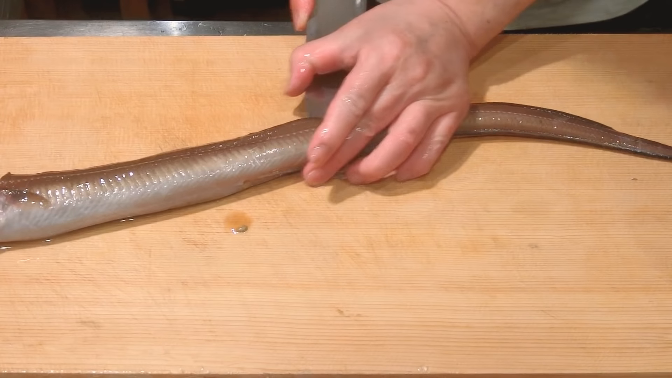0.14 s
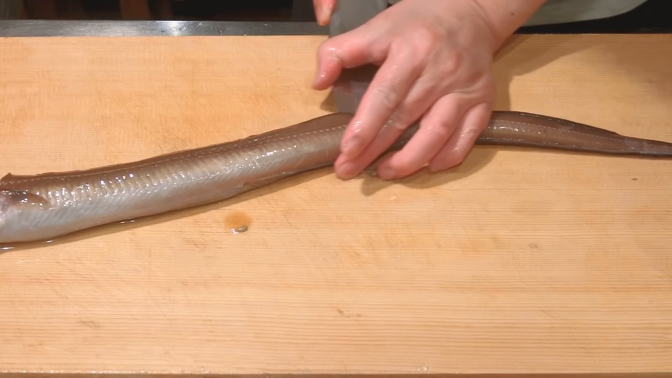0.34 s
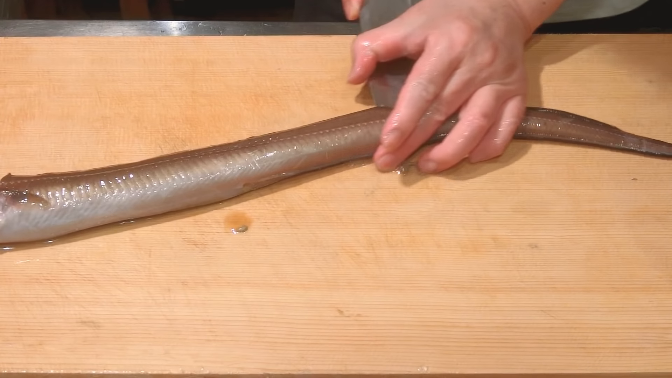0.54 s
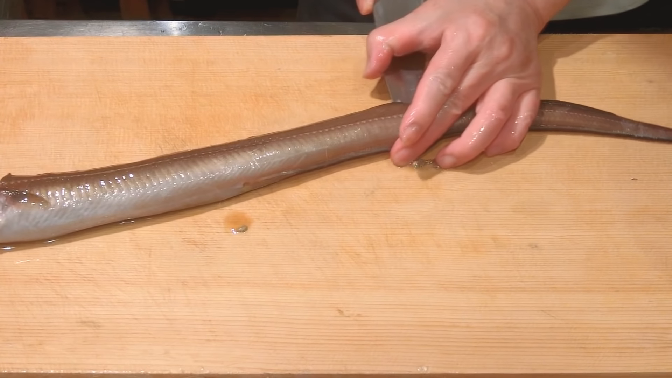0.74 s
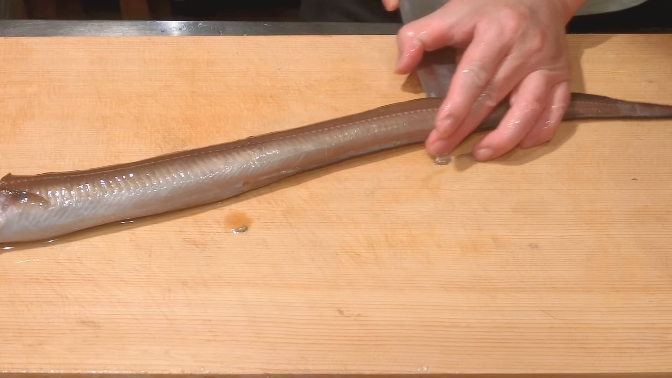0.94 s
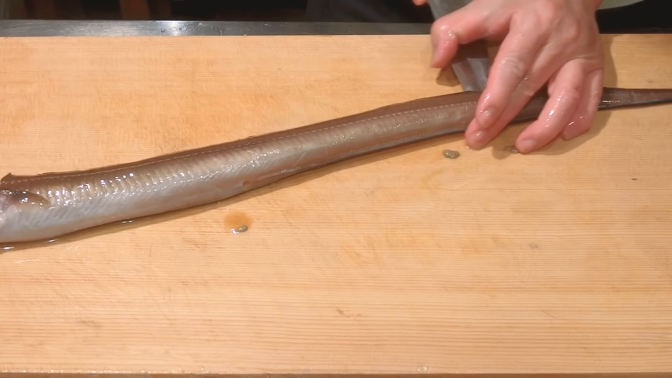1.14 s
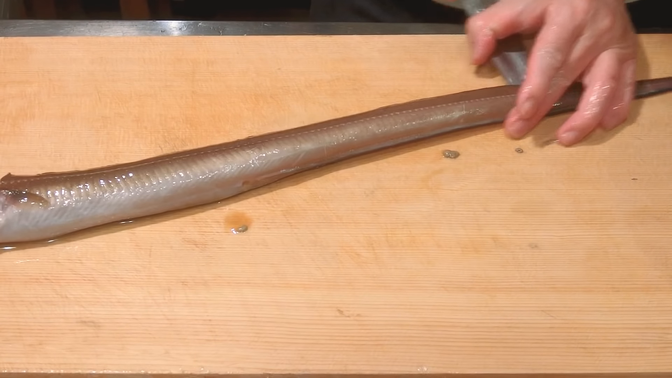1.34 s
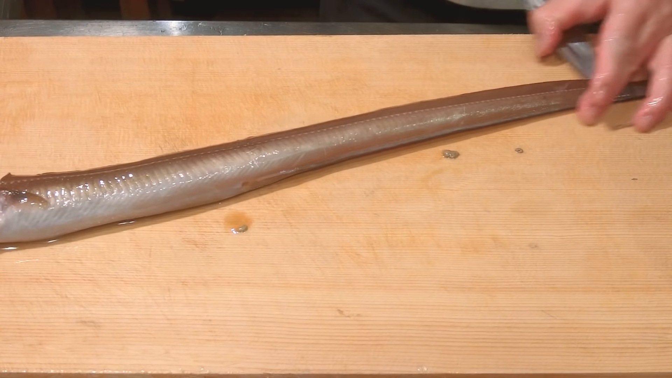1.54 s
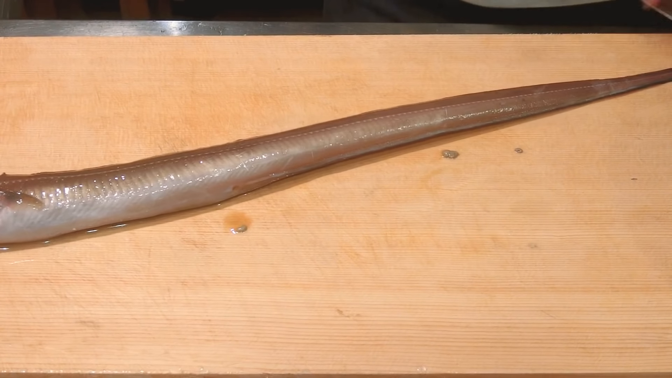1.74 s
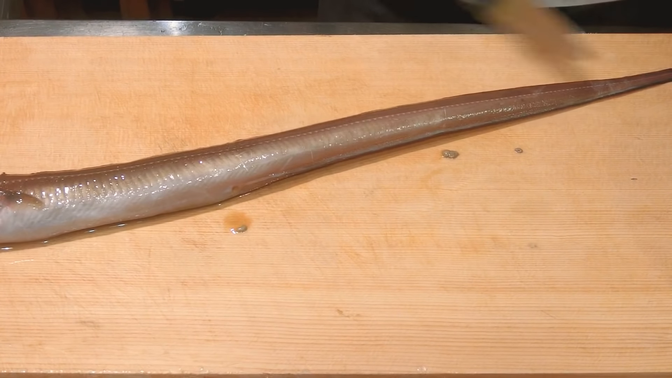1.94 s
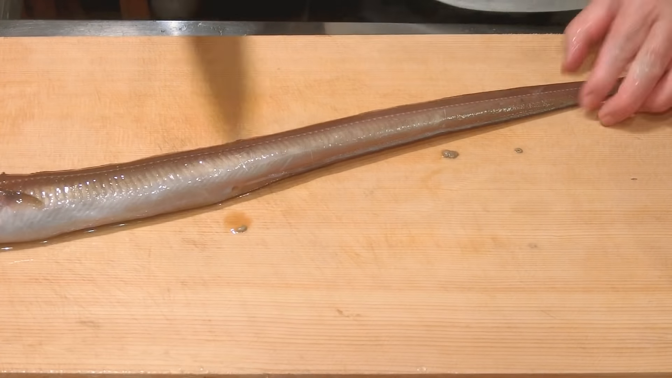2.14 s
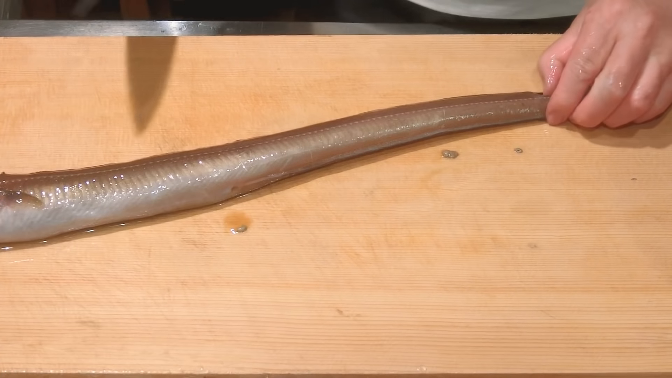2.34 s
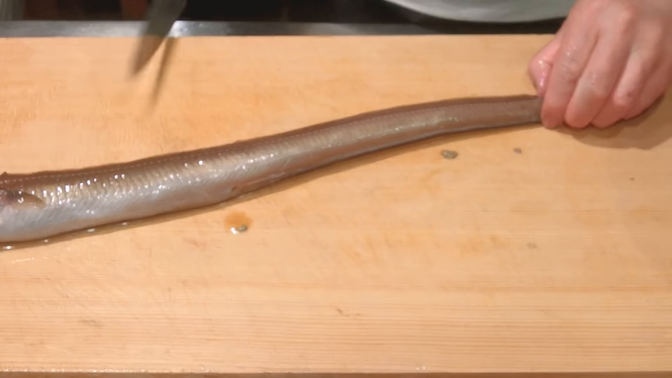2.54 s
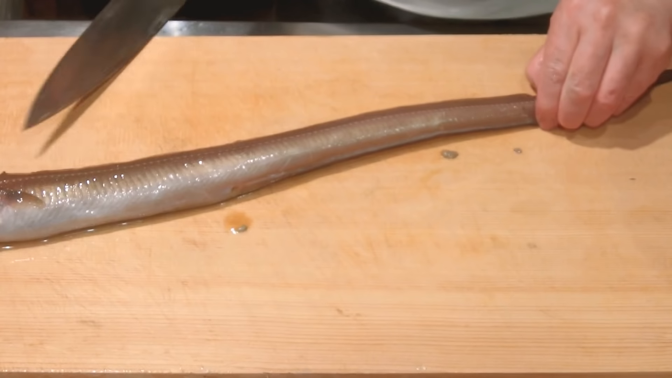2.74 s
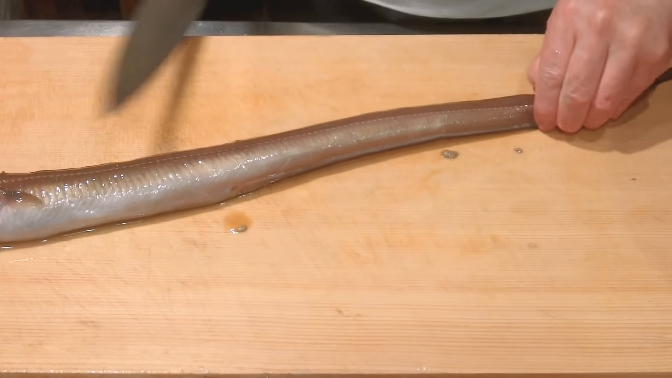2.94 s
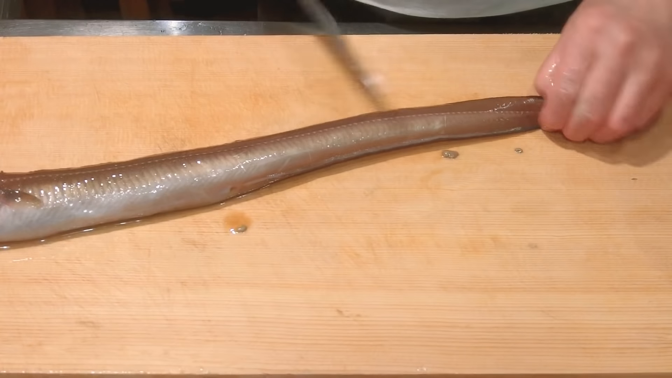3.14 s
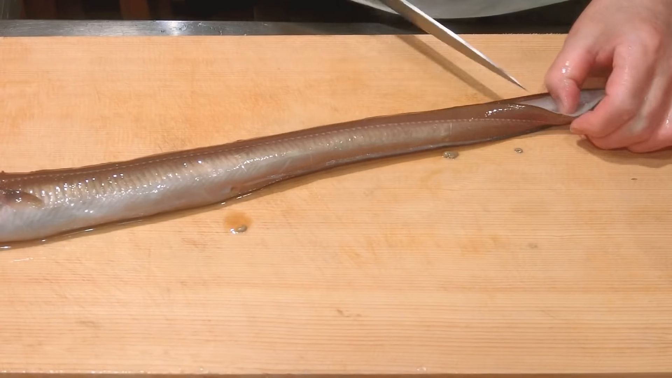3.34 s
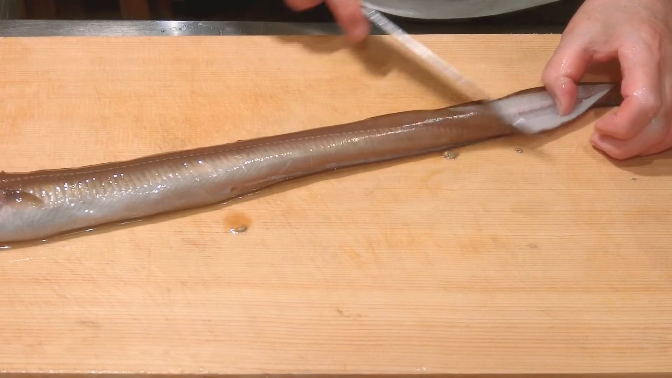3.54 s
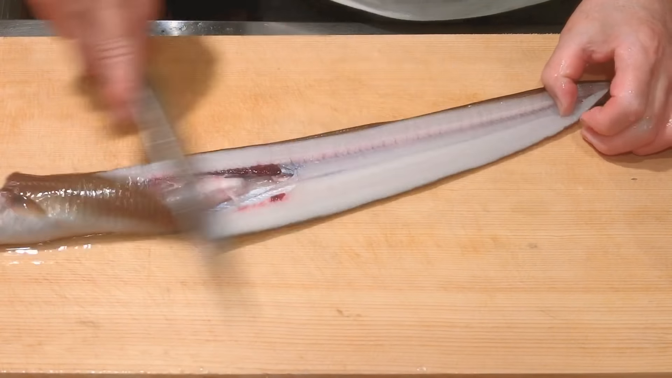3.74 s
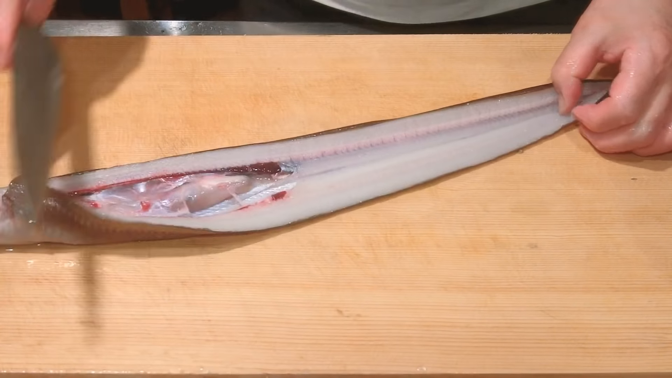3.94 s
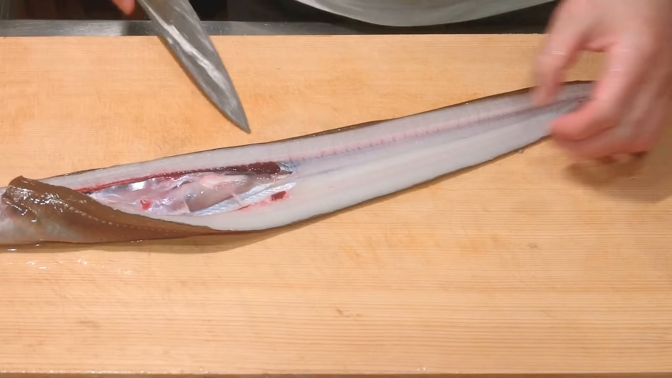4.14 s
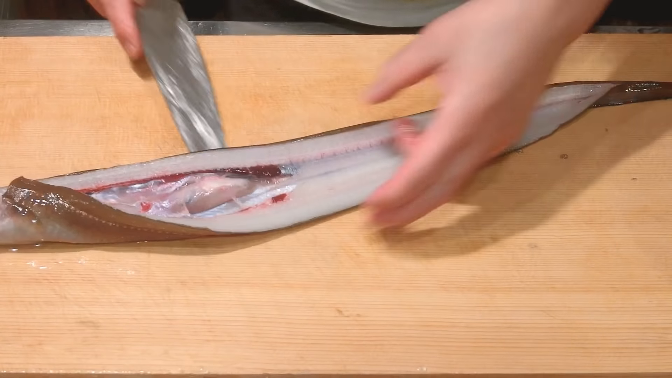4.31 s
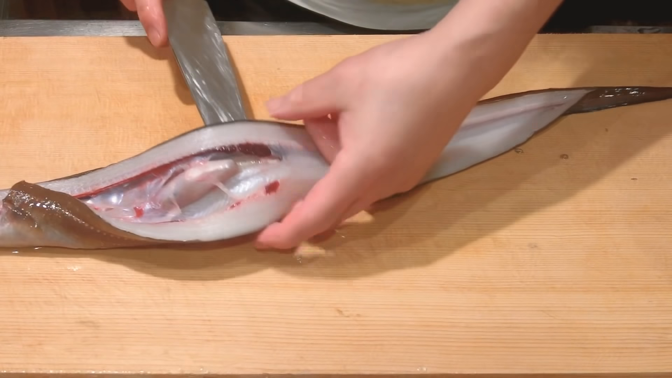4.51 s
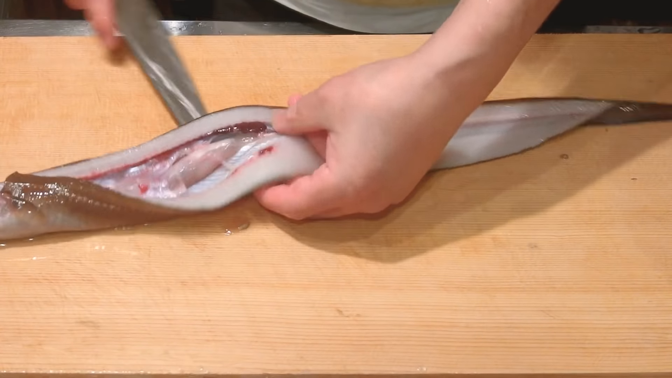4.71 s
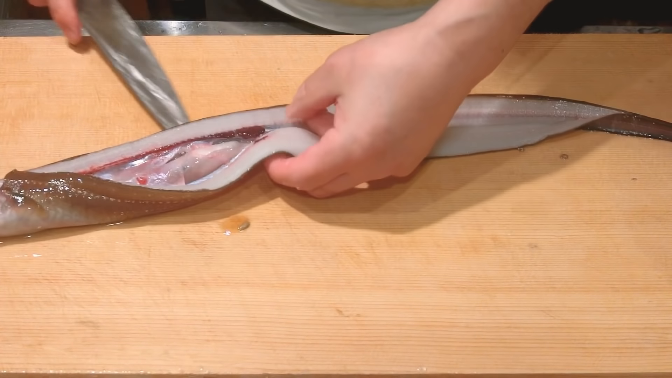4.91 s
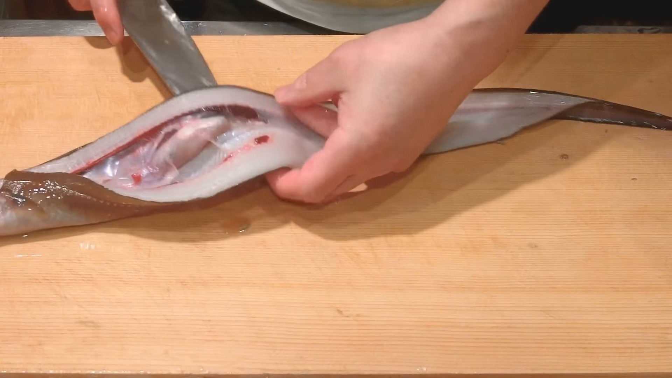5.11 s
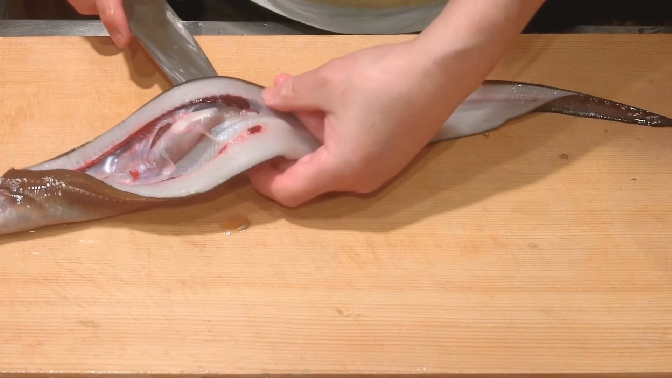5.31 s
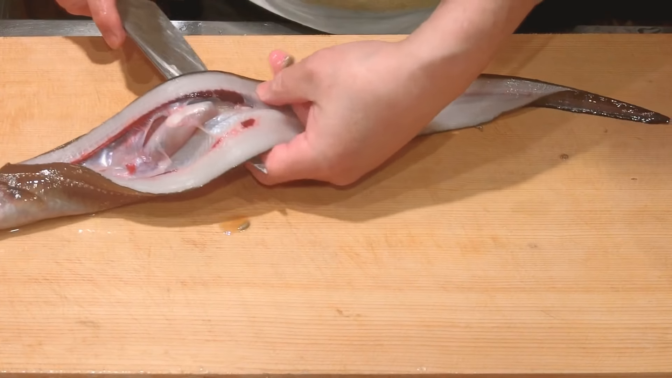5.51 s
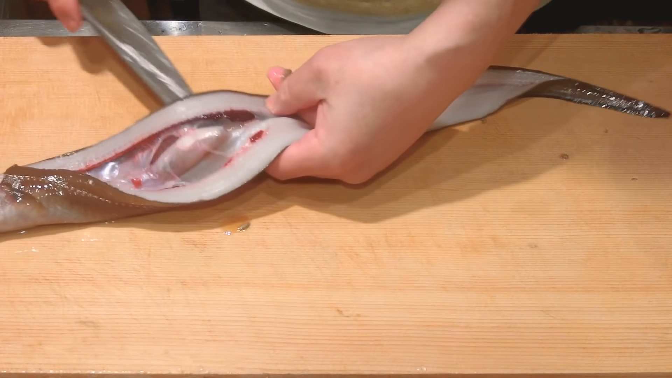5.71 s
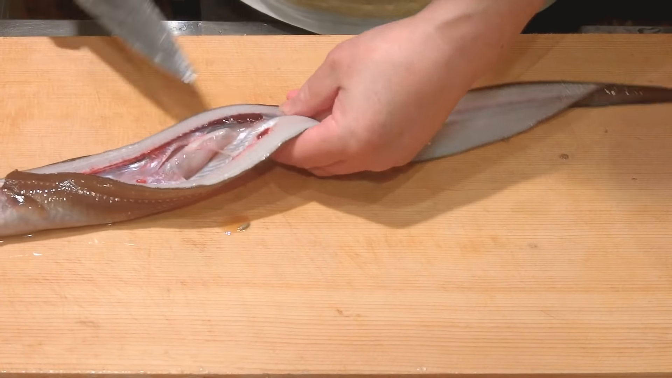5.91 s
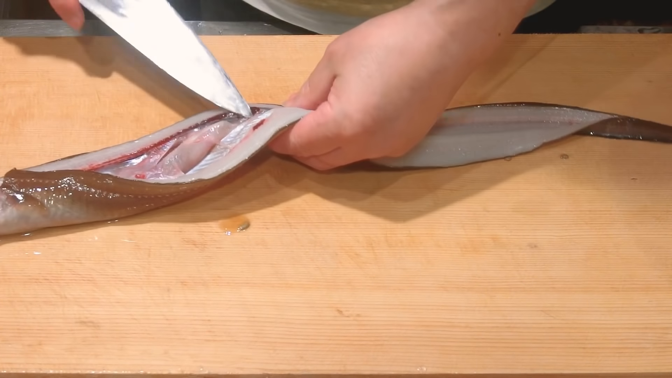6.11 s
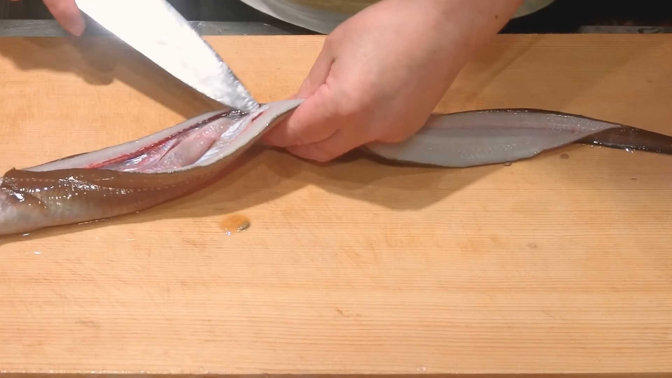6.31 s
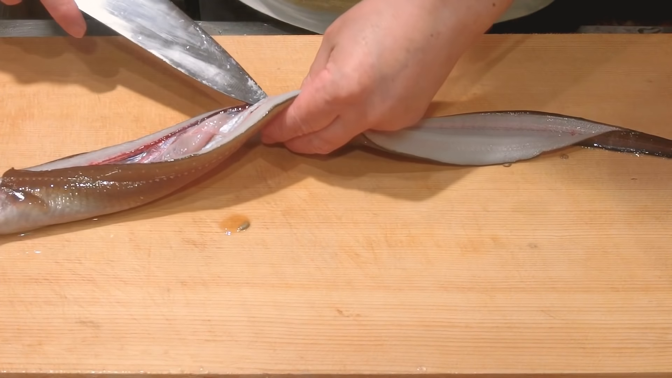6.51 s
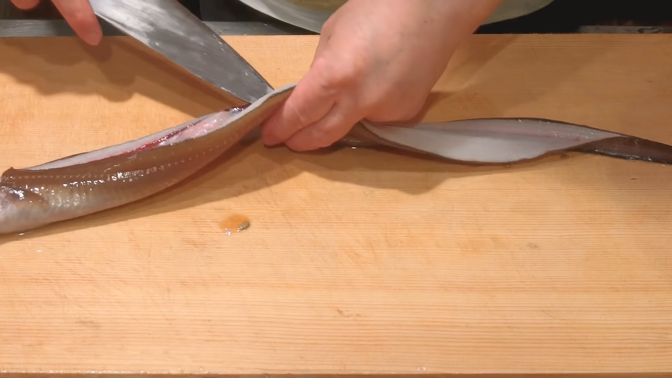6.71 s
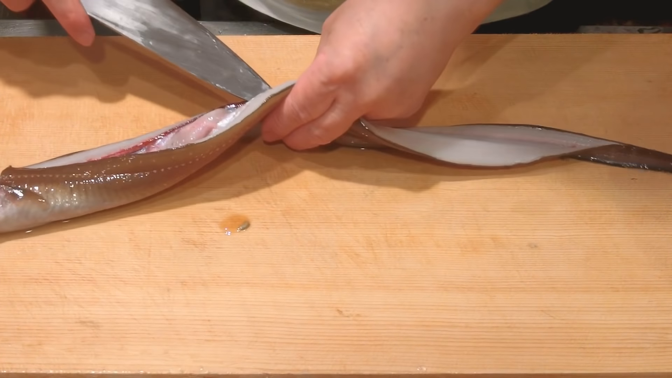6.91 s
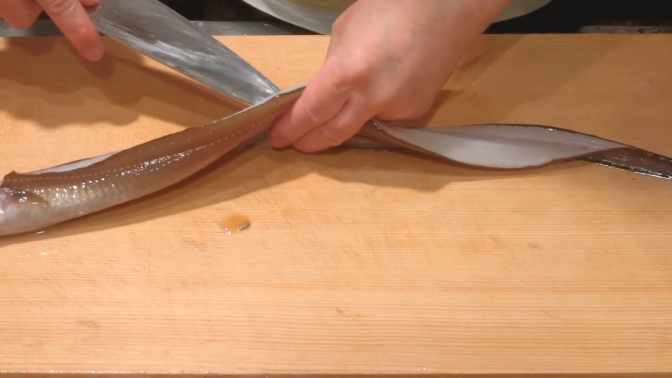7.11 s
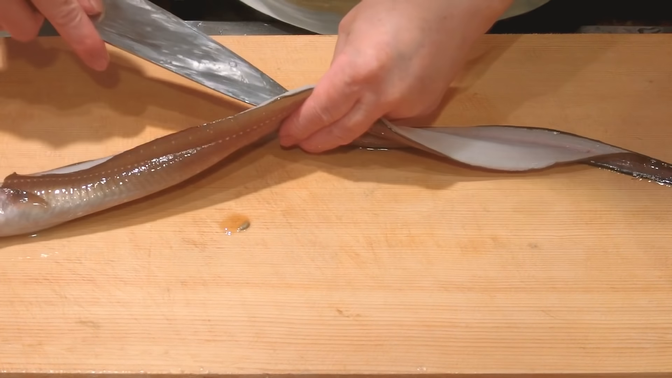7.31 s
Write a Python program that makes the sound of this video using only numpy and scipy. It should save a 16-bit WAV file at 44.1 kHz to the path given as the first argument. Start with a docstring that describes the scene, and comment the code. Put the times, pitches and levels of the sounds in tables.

```python
"""Small kitchen, close stereo view of a wooden board: a knife crunches through an eel's fine bones in two strokes.
Hands lean, a faint knock, light ticks and hollow bumps follow; then the blade wipes the fillet open in one
short hiss, drops and bounces with a metallic ring, and knocks the board hard. Later a faint low drone glides up,
bumps and ticks return, and two squeaks close. Snaps, grains and noise drive resonances of steel and wood;
blows add dying sines, near walls add a short tail, and shaped noise gives the steady air throughout."""
import sys
import numpy as np
from scipy import signal
from scipy.fft import rfft, irfft
from scipy.io import wavfile

SR = 44100
rng = np.random.default_rng(int(sys.argv[2]) if len(sys.argv) > 2 else 0)


def transcribe(signal):
    """Save signal, clipped to [-1, 1], as a 16-bit WAV file at the path in sys.argv[1]."""
    frames = np.atleast_2d(signal).T
    limited = np.clip(frames, -1, 1)
    pcm = np.round(limited * 32767).astype(np.int16)
    wavfile.write(sys.argv[1], SR, pcm)


N = 328986
TIME = np.arange(N) / SR
RING_TIME = TIME[:SR // 2]

# thicker bones snapping under the edge: (time [s], relative level [dB], fizz against blade ring [dB])
THICK_BONES = [(0.077, -39, 2), (0.108, -37.5, 1), (.13, -32.5, 4), (.155, -31, -1), (0.2759, -28.5, -1),
               (0.3131, -32, -11), (0.3384, -30.5, 0.5), (.5613, -28, -1.5), (0.7539, -28, -5),
               (0.812, -34.5, 3), (0.832, -28, -5), (0.8606, -28.5, -4), (0.883, -27, -1.5),
               (0.9463, -28, -3), (0.992, -27.5, -0.5), (1.0515, -27, -2), (1.129, -28.5, -0.5),
               (1.1847, -39, 2), (1.2133, -31, -14), (1.254, -31, -1), (1.4137, -23.5, -7),
               (1.4395, -24.5, -0.5), (1.4664, -29, -3), (1.494, -23, 1.5), (1.5371, -24, 1.5),
               (1.5588, -23, -4), (1.5896, -23.5, 1), (1.6078, -24, -18)]
# strokes of the long cut: (start [s], end [s], relative level [dB])
CUT_STROKES = [(0.097, 0.635, 0.5), (0.758, 1.619, -1.5)]
# how hard the hand bears down, most at the tail: (time [s], pressure [dB])
HAND_PRESSURE = [(.1, -3.5), (.56, -2.5), (.78, -2), (.9, 1.5), (1.06, 2), (1.115, -2), (1.2, 1.5),
                 (1.32, 5), (1.6, 11), (1.7, 11.5)]
# spectrum of the wet fizz: (frequency [Hz], relative level [dB])
FIZZ_SPECTRUM = [(1500, -13.5), (3500, -2.5), (6000, -5), (8500, -5.5), (10500, -1), (12500, 4), (14500, 3),
                 (16000, -8)]
# spectrum of the board under the cut: (frequency [Hz], relative level [dB])
BOARD_SPECTRUM = [(40, -17.5), (90, -25), (145, 5), (230, -12.5), (400, -4.5), (560, -1), (800, 11.5),
                  (1000, 7), (1350, 8), (2000, 5.5), (3000, -0.5), (6000, -56)]
# the blade's main ring, damped by flesh: (frequency [Hz], width [Hz], relative level [dB])
BLADE_MAIN_RING = [(2840, 117, -6), (2954, 64, 3)]
# the blade's upper ring: (frequency [Hz], width [Hz], relative level [dB])
BLADE_UPPER_RING = [(4340, 250, 1.5), (4240, 220, 6), (6340, 570, -5)]
# spectrum of the board under the sweep: (frequency [Hz], relative level [dB])
SWEEP_BOARD_SPECTRUM = [(88, -40), (150, -14), (433, -32), (509, 7.5), (598, -53), (749, 10), (969, -12),
                        (1160, -4), (1760, 4.5), (1930, -11), (2800, 13), (3800, -0.5), (7000, -12),
                        (9100, -53), (15400, -120)]
# modes of the free blade: (frequency [Hz], width [Hz], relative level [dB])
FREE_BLADE = [(2160, 31, -0.5), (2270, 60, 5), (2630, 35, 2.5), (2820, 42, -15), (3260, 32, -18),
              (3404, 27, 5), (4770, 130, -11), (5800, 59, -3), (7030, 84, -7), (9400, 60, 1),
              (10850, 130, 0.5), (12330, 58, -14), (13200, 120, -13), (13700, 58, -10), (14500, 62, -11)]
# the knife drops on the board and bounces: (time [s], relative level [dB])
KNIFE_BOUNCES = [(4.1598, 2), (4.1622, -8.5), (4.1968, -1.5), (4.2212, -7.5)]
# broad resonances under the bouncing knife: (frequency [Hz], width [Hz], relative level [dB])
BOUNCE_RESONANCES = [(517, 59, -11), (1070, 74, 14.5), (1486, 120, 13.5), (2000, 270, 8), (2530, 160, 8.5),
                     (2760, 210, -13), (3440, 190, -1), (4250, 200, -4), (4470, 170, -16), (6000, 120, -19),
                     (12000, 5000, -15)]
# the knife's ring, before tilt: (frequency [Hz], relative level [dB])
KNIFE_RING = [(521, -2), (619, -9), (974, -5), (1004, -4), (1056, -2), (1091, -2), (1462, -3), (1546, 0),
              (1581, -3), (2026, -5), (2063, -5), (2196, -6), (2225, -6), (2496, -2), (2542, -4),
              (2577, -3), (2960, -8), (3353, -10), (3551, -13), (4439, -12), (5039, -15), (6012, -13),
              (6068, -14), (11272, -20), (11329, -20)]
# knocks on the board, the first far fainter: (time [s], relative level [dB])
BOARD_KNOCKS = [(2.1332, -25), (4.7133, 2.5)]
# broad resonances under a knock: (frequency [Hz], width [Hz], relative level [dB])
KNOCK_RESONANCES = [(542, 47, 5.5), (840, 100, 7), (1135, 300, 14.5), (1870, 260, 13.5), (2190, 220, 6.5),
                    (2610, 210, -18), (3120, 55, 8), (3270, 73, 6.5), (4320, 64, 0.5), (5960, 180, -17),
                    (10300, 3500, -12), (11100, 890, -11), (14500, 260, -1)]
# ring of board and blade struck together, before tilt: (frequency [Hz], relative level [dB])
KNOCK_RING = [(138, -16), (345, -13), (518, -8), (620, -11), (817, -9), (933, -9), (1069, -7), (1134, -4),
              (1182, 0), (1240, -3), (1346, -1), (1718, -2), (1831, -5), (2020, -5), (2125, -2), (2157, -4),
              (2295, -6), (2490, -7), (2686, -3), (2879, -8), (2944, -6), (3133, -1), (3465, -8),
              (4297, -9), (4841, -9), (6020, -16), (7100, -18), (9384, -17), (11300, -18), (14590, -11)]
# light taps and wet ticks of knife and fingers:
# (time [s], relative level [dB], centre [Hz], spread [octaves], decay [s])
LIGHT_TICKS = [(2.138, -26.5, 690, 1.03, 0.011), (2.387, -45, 3100, .5, 0.0041),
               (2.4004, -43, 2800, 0.46, .005), (2.4174, -40, 3350, 0.64, 0.0039),
               (2.453, -39.5, 3040, 0.4, 0.0028), (2.7, -43, 5000, 2, 0.009),
               (2.705, -41, 11600, .5, 0.068), (2.728, -35.5, 1480, 1.14, 0.037),
               (2.972, -41.5, 1350, 0.46, 0.0064), (2.99, -32, 1080, 1.1, 0.0055),
               (3.236, -42, 2950, 0.38, 0.0026), (3.266, -43.5, 3500, 2.1, 0.0056),
               (3.6255, -43, 11400, 0.6, .003), (3.731, -28, 2800, 0.14, 0.0038),
               (3.754, -19, 12900, 0.15, 0.0037), (5.017, -41, 4300, 2, 0.05),
               (5.7049, -38, 11100, 0.21, 0.0029), (6.668, -38, 1880, 0.98, 0.0072),
               (6.669, -43.5, 4400, 0.11, 0.014), (6.67, -38, 12500, 0.86, 0.031),
               (6.991, -49, 10900, .9, .005), (7.4277, -45, 6000, 2, .008)]
# dull bumps of things moved on the counter: (time [s], relative level [dB], upper against lower ring [dB])
COUNTER_BUMPS = [(2.683, -4, -5), (2.715, -5, -3), (2.731, -7.5, 7), (2.751, -9, -2), (2.773, -10, 9),
                 (6.874, -4.5, -5), (6.919, -11, 4.5), (6.942, -14, 2), (6.969, -10.5, 1)]
# low and high pair of bump modes, before tilt: (frequency [Hz], relative level [dB])
BUMP_RING = [(340, 3.5), (430, 5.5), (1050, 12), (1170, 0)]
# hands land and lean on the board: (time [s], level [dB], release [dB per s])
HAND_PRESSES = [(1.43, -59.5, 50), (2.14, -56, 200), (2.566, -51.5, 600), (2.73, -59.5, 73),
                (4.72, -58, 135), (4.9, -66, 9.5)]
# two faint squeaks: (time [s], length [s], level [dB], frequency [Hz])
FAINT_SQUEAKS = [(7.272, 0.063, -60.5, 1870), (7.385, 0.08, -57, 1850)]
# spectrum of the air noise: (frequency [Hz], relative level [dB])
AIR_SPECTRUM = [(15, -69), (25, -18), (49, -16), (114, -22), (137, -19), (170, -10.5), (236, -16),
                (394, -9), (560, -13), (607, -5.5), (1160, -18.5), (1890, -18.5), (2910, -22.5),
                (14400, -31.5), (16000, -31.5)]
# resonances in the air noise: (frequency [Hz], width [Hz], relative level [dB])
AIR_RESONANCES = [(177.8, 13, -2), (417, 20, -7.5), (524, 14.5, 1.5), (611, 13, 2.5), (737, 13, -3),
                  (927, 13.3, -1)]
# stereo side of the work on the board: (frequency [Hz], relative level [dB])
WORK_SIDE = [(60, -1), (200, -4), (1000, -22), (2200, -33), (4500, 0), (9000, 4.5), (15000, -0.5)]
# stereo side of the hits: (frequency [Hz], relative level [dB])
HIT_SIDE = [(60, -12), (300, -20), (900, -18.5), (2000, -15), (2800, -7), (4500, -2), (9000, 1),
            (15000, -2)]
# stereo side of the air: (frequency [Hz], side against mid [dB])
AIR_SIDE = [(60, -4), (110, -19), (200, -8), (380, -10), (700, -13.5), (1290, -5), (2380, -4.5), (4400, -1),
            (8120, -0.5), (15000, 3)]

STROKE_RISE_S, EDGE_RELEASE_DB_PER_S, BOARD_RELEASE_DB_PER_S = 0.008, 520, 200
# drive of each layer at pressure 0 dB, and the dB it gains per dB of pressure
RASP_DB, RASP_SLOPE = -52.5, 0.54
FIZZ_DB, FIZZ_SLOPE = -44, 0.75
BOARD_DB, BOARD_SLOPE = -53, 1.11
SNAP_DB = 13.5  # gain of the snaps into blade and fizz
# fine bones come at a loose, steady pace; scatter is a share of the gap, levels are relative
FINE_GAP_S, FINE_SCATTER, FINE_DB, FINE_SPREAD_DB, FINE_FIZZ_DB = 0.017, 0.3, -35, 2, -3.5
STALL_S, STALL_DB = 0.019, -6.5  # the edge slows just before a thick bone gives
# the sweep holds full speed between two times
SWEEP_FROM_S, SWEEP_TO_S, SWEEP_RISE_DB_PER_S, SWEEP_FALL_DB_PER_S = 3.679, 3.785, 300, 398
SWEEP_HISS_DB, SWEEP_BODY_DB = -40.5, -45.5  # relative drive
SLAP_S, SLAP_WIDTH_S, SLAP_DB = 3.732, 0.014, 14  # midway the blade leans on the board
HIT_DIP_HZ, HIT_DIP_WIDTH_HZ, HIT_DIP_SHARE = 3930, 280, 0.59  # a gap between the struck modes
PRESS_RISE_DB_PER_S = 900
DRONE_FROM_S, DRONE_TO_S, DRONE_EDGE_DB_PER_S = 5.27, 5.86, 253
DRONE_START_DB, DRONE_SWELL_DB = -66, 2
DRONE_LOW_HZ, DRONE_HIGH_HZ, DRONE_GLIDE_AT_S, DRONE_GLIDE_S = 143.9, 161, 5.39, 0.05
AIR_DB, AIR_RESONANCE_DB = -59.73, -64.5
EDGE_HZ = 15900


def cut():
    """The edge stalls on bones and snaps through; with tearing fibres it rings blade, fizz and board."""
    pressure = np.interp(TIME, *np.transpose(HAND_PRESSURE))
    edge, board = strokes(EDGE_RELEASE_DB_PER_S), strokes(BOARD_RELEASE_DB_PER_S)
    snaps, spits, stall = np.zeros(N), np.zeros(N), np.zeros(N)
    for at, db, wet_db in THICK_BONES:
        add(snaps, at, amp(db) * burst(decay_s=0.0087))
        add(spits, at, amp(db + wet_db) * burst(decay_s=0.01))
        add(stall, at - STALL_S, np.sqrt(np.linspace(0, 1, int(STALL_S * SR))))
    moving = amp(STALL_DB * stall)
    bite = edge * amp(RASP_SLOPE * pressure)
    fine = fine_bones() * moving * bite
    snaps = snaps + fine
    spits = spits + amp(FINE_FIZZ_DB) * fine

    grip = judder(depth_db=3.0, rate_hz=250) * moving
    fibres = grains(per_s=2700, spread_db=9.0) * grip
    film = grains(per_s=5000, spread_db=0.0) * grip
    drive = amp(RASP_DB) * fibres * bite + amp(SNAP_DB) * snaps

    # bearing down chokes the blade's upper ring and passes more of each snap to the wood
    choke = amp(-0.6 * np.maximum(pressure, 0) - 3.5)
    blade = through(drive, resonances(BLADE_MAIN_RING))
    blade = blade + through(drive * choke, resonances(BLADE_UPPER_RING))
    wet = film * edge * amp(FIZZ_DB + FIZZ_SLOPE * pressure) + amp(SNAP_DB) * spits
    fizz = through(wet, unit_energy(colour(FIZZ_SPECTRUM)))
    push = grains(per_s=3500, spread_db=0.0) * grip * board * amp(BOARD_DB + BOARD_SLOPE * pressure)
    push = push + snaps * amp(6.5 + 0.5 * pressure)
    return blade + fizz + through(push, unit_energy(colour(BOARD_SPECTRUM)))


def strokes(release_db_per_s):
    """Gain of the cutting strokes: each bites at once, holds and dies away."""
    gain = np.zeros(N)
    for start, end, db in CUT_STROKES:
        rise = np.clip((TIME - start) / STROKE_RISE_S, 0, 1)
        gain += rise * amp(db - release_db_per_s * np.maximum(TIME - end, 0))
    return gain


def fine_bones():
    """A loosely regular run of small snaps of uneven size."""
    out = np.zeros(N)
    for k, (shift, size) in enumerate(rng.standard_normal((120, 2))):
        at = (k + FINE_SCATTER * shift) * FINE_GAP_S
        add(out, at, amp(FINE_DB + FINE_SPREAD_DB * size) * burst(decay_s=0.0065))
    return out


def sweep():
    """The blade skims wet flesh: fine grains excite the board, wet fizz and narrow modes of the steel."""
    speed = held(SWEEP_FROM_S, SWEEP_TO_S, SWEEP_RISE_DB_PER_S, SWEEP_FALL_DB_PER_S)
    lean_db = SLAP_DB * np.exp(-((TIME - SLAP_S) / SLAP_WIDTH_S) ** 2)
    grip = judder(depth_db=3.0, rate_hz=150) * speed
    rub = grains(per_s=2300, spread_db=5.5) * grip * amp(SWEEP_BODY_DB + lean_db)
    body = through(rub, unit_energy(colour(SWEEP_BOARD_SPECTRUM)))
    skim = grains(per_s=6200, spread_db=3.0) * grip * amp(SWEEP_HISS_DB)
    hiss = amp(3.5) * through(skim, unit_energy(colour(FIZZ_SPECTRUM)))
    steel = amp(-1.5) * through(skim, resonances(FREE_BLADE))
    return body + hiss + steel


def strike(blows, body, ringing, crack_db, rattle_db, rattle_s, wet_db):
    """A sharp crack and short dense rattle of the wood, thrown back by the walls, over ringing modes."""
    force, rings = np.zeros(N), np.zeros(N)
    for s, db in blows:
        add(force, s, amp([db + crack_db]))  # a single-sample click
        add(force, s, amp(db + rattle_db) * burst(rattle_s))
        add(rings, s, amp(db) * ringing)
    gap = signal.lfilter(*signal.iirpeak(HIT_DIP_HZ, HIT_DIP_HZ / HIT_DIP_WIDTH_HZ, SR), force)
    wood = through(force - HIT_DIP_SHARE * gap, resonances(body))
    return kitchen(wood, wet_db, t60=0.27) + rings


def ticks():
    """Small contacts: a short puff with one broad hump in its spectrum."""
    out, hz = np.zeros(N), np.geomspace(50, 16000, 40)
    for s, db, centre_hz, octaves, decay_s in LIGHT_TICKS:
        hump_db = -12 * np.log1p((np.log2(hz / centre_hz) / octaves) ** 2)
        puff = through(burst(decay_s), unit_energy(colour(np.c_[hz, hump_db])))
        add(out, s, amp(db + 11.0) * puff)
    return out


def bumps():
    """Soft blows on something hollow with a low and a high pair of modes."""
    out = np.zeros(N)
    low = ring(BUMP_RING[:2], t60=0.048, damping=0.26, tilt_db=-3.0)
    high = ring(BUMP_RING[2:], t60=0.048, damping=0.26, tilt_db=-3.0)
    for s, db, upper_db in COUNTER_BUMPS:
        hollow = low + amp(upper_db) * high
        add(out, s, amp(db - 53) * through(hollow, burst(decay_s=0.002)))
    return out


def handling():
    """Hands press and drag on the board: noise in low resonances, and two short narrow-band squeaks."""
    weight = sum(amp(db) * held(s, s, PRESS_RISE_DB_PER_S, release) for s, db, release in HAND_PRESSES)
    low_modes = resonances([(70, 17, -7), (118, 13, 1.0), (169, 23, 0.0)])
    out = through(rng.standard_normal(N) * weight, low_modes)
    for s, length, db, hz in FAINT_SQUEAKS:
        squeak = through(rng.standard_normal(len(RING_TIME)), resonances([(hz, 120, 0)]))
        squeak = unit(squeak[:int(length * SR)])
        add(out, s, amp(db) * squeak * np.hanning(len(squeak)))
    return out


def drone():
    """A low tone of wavering level with a weaker partner a fifth below; it grows as its pitch rises."""
    risen = (1 + np.tanh((TIME - DRONE_GLIDE_AT_S) / DRONE_GLIDE_S)) / 2
    hz = DRONE_LOW_HZ + (DRONE_HIGH_HZ - DRONE_LOW_HZ) * risen
    phase = 2 * np.pi * np.cumsum(hz) / SR
    tone = np.sqrt(2) * (np.sin(phase) + amp(-12) * np.sin(phase / 1.5))
    gain = amp(DRONE_START_DB + DRONE_SWELL_DB * risen)
    gain = gain * held(DRONE_FROM_S, DRONE_TO_S, DRONE_EDGE_DB_PER_S, DRONE_EDGE_DB_PER_S)
    return gain * judder(depth_db=-1.5, rate_hz=12) * tone


def kitchen(x, wet_db, t60):
    """Nearby walls add a short, dense tail of decaying noise with its own spectrum."""
    t = RING_TIME
    onset = np.clip(t / 0.0024 - 0.5, 0, 1)  # begins 1.2 ms after the direct sound
    tail = rng.standard_normal(len(t)) * np.exp(-np.log(1000) * t / t60) * onset
    tail = through(unit_energy(tail), colour([(100, 4.4), (1000, 0.52), (3000, 1.9), (6000, 3.9), (15000, 1.7)]))
    return x + amp(wet_db) * through(x, tail)


def air():
    """Steady ventilation noise with a few faint resonances."""
    wash = amp(AIR_DB) * unit(through(rng.standard_normal(N), colour(AIR_SPECTRUM)))
    return wash + amp(AIR_RESONANCE_DB) * through(rng.standard_normal(N), resonances(AIR_RESONANCES))


def amp(db):
    """Decibels to gain."""
    return 10 ** (np.asarray(db) / 20)


def unit(x):
    """Scaled to rms 1."""
    return x / np.sqrt(np.mean(x ** 2) + 1e-20)


def unit_energy(x):
    """Scaled to energy 1."""
    return x / np.sqrt(np.sum(x ** 2) + 1e-20)


def add(mix, s, sound):
    """Lays a sound into the mix at time s, or at the start if s is negative."""
    part = mix[max(round(s * SR), 0):][:len(sound)]
    part += sound[:len(part)]


def through(x, response):
    """Convolution, kept to the input's length."""
    return signal.fftconvolve(x, response)[:len(x)]


def held(start, end, rise_db_per_s, fall_db_per_s):
    """A gain of 1 from start to end, with an attack before and a release after."""
    return amp(-rise_db_per_s * np.clip(start - TIME, 0, 1) - fall_db_per_s * np.maximum(TIME - end, 0))


def colour(points, size=4096):
    """Causal minimum-phase impulse response with the given (frequency [Hz], level [dB]) spectrum."""
    f, db = np.transpose(points)
    bins = abs(np.fft.fftfreq(size, 1 / SR))
    log_gain = np.log(amp(np.interp(np.log(bins + 1), np.log(f + 1), db)))
    return np.fft.ifft(np.exp(np.conj(signal.hilbert(log_gain)))).real[:size // 2]


def resonances(peaks):
    """Impulse response of dying cosines (frequency [Hz], width [Hz], level [dB]); wider ones die sooner."""
    t, response = RING_TIME, 0
    for hz, width, db in peaks:
        response = response + amp(db) * width * np.exp(-np.pi * width * t) * np.cos(2 * np.pi * hz * t)
    response[0] /= 2  # half a step at the onset keeps the valleys dark
    return unit_energy(response)


def ring(modes, t60, damping, tilt_db):
    """Dying sines; t60 [s] holds at 1 kHz, higher modes die sooner, tilt is in dB per octave."""
    t, out = RING_TIME, 0
    for k, (hz, db) in enumerate(modes):
        khz = hz / 1000
        fall = np.exp(-np.log(1000) * t * khz ** damping / t60)
        out = out + (-1) ** k * amp(db + tilt_db * np.log2(khz)) * fall * np.sin(2 * np.pi * hz * t)
    return out


def burst(decay_s):
    """A dying puff of noise with a nearly even spectrum and energy 1."""
    fade = np.exp(-TIME[:4096] / decay_s)
    puff = rng.standard_normal(len(fade)) * fade
    for _ in range(3):  # flatten the spectrum, then restore some of the fade
        z = rfft(puff)
        puff = irfft(z / (abs(z) + 1e-12), len(fade)) * fade ** (1 / 4)
    return unit_energy(puff)


def grains(per_s, spread_db):
    """Random tiny clicks; spread makes a few much larger than the rest."""
    size = amp(spread_db * np.minimum(rng.exponential(1, N), 4))
    present = rng.random(N) < per_s / SR
    return unit(size * rng.choice([-1, 1], N) * present)


def judder(depth_db, rate_hz):
    """Uneven grip: a gain that wanders about 1."""
    knots = rng.standard_normal(N)
    return unit(amp(depth_db * np.interp(TIME * rate_hz, np.arange(N), knots)))


def scene():
    """The work on the board sits in the middle; its treble reaches left and right as unlike crackle."""
    knife_ring = amp(-33) * ring(KNIFE_RING, t60=0.11, damping=0.21, tilt_db=1.0)
    board_ring = amp(-30) * ring(KNOCK_RING, t60=0.19, damping=0.24, tilt_db=0.7)
    hits = strike(KNIFE_BOUNCES, BOUNCE_RESONANCES, knife_ring,
                  crack_db=-10, rattle_db=-1.0, rattle_s=0.0039, wet_db=-6.5)
    hits += strike(BOARD_KNOCKS, KNOCK_RESONANCES, board_ring,
                   crack_db=0.5, rattle_db=5.0, rattle_s=0.0034, wet_db=-6.5)
    small = ticks() + bumps()
    near = kitchen(cut() + sweep() + small, wet_db=-7.5, t60=0.27)
    mid = near + hits + handling() + drone() + air()

    # the side gets fresh draws of cut, sweep and air; bursts smear the small sounds and hits
    work = through(cut() + sweep() + through(small, burst(decay_s=0.0012)), colour(WORK_SIDE))
    knocks = through(through(hits, burst(decay_s=0.0015)), colour(HIT_SIDE))
    side = amp(-7) * kitchen(work + knocks, wet_db=-2.5, t60=0.22)
    side = side + through(air(), colour(AIR_SIDE))
    return np.array([mid + side, mid - side])


def record(dry):
    """The recorder's band limit: a steep low-pass on both channels."""
    low_pass = signal.firwin(255, EDGE_HZ, window=("kaiser", 8), fs=SR)
    return signal.oaconvolve(dry, low_pass[None], "same")


dry = scene()
out = record(dry)
transcribe(out)
```